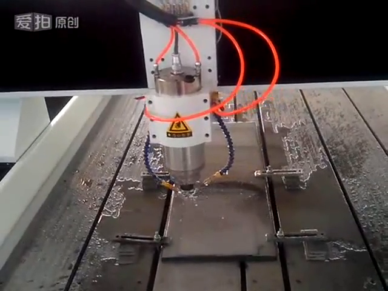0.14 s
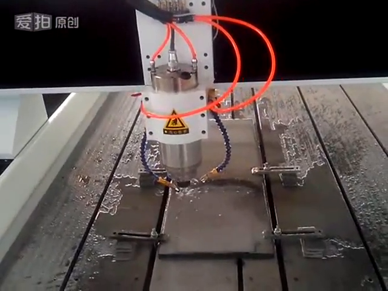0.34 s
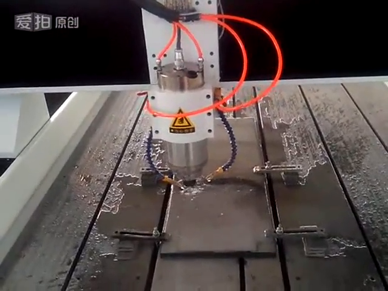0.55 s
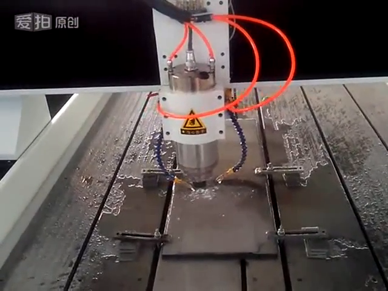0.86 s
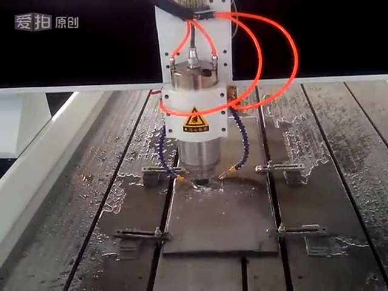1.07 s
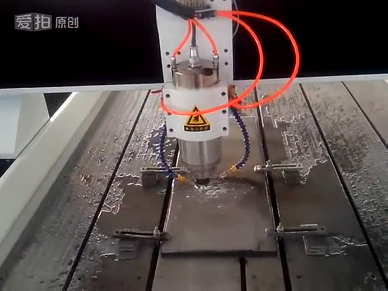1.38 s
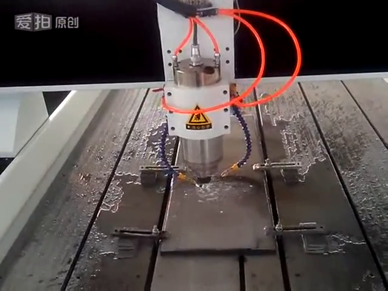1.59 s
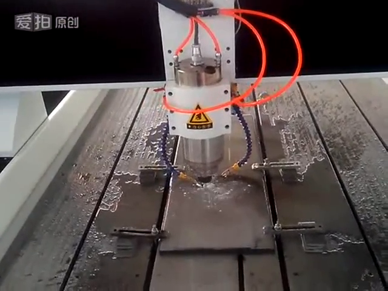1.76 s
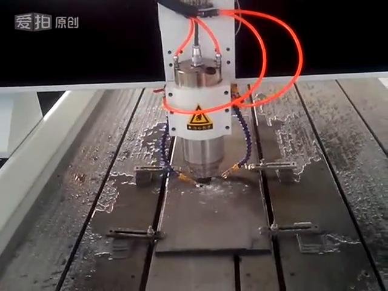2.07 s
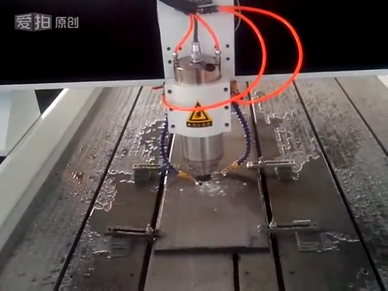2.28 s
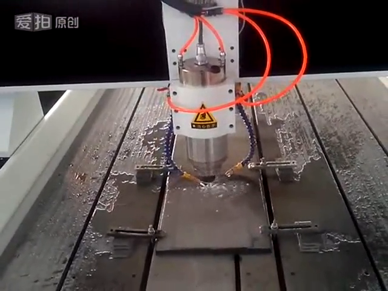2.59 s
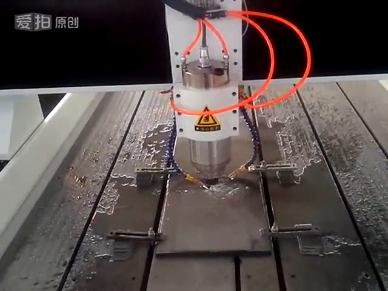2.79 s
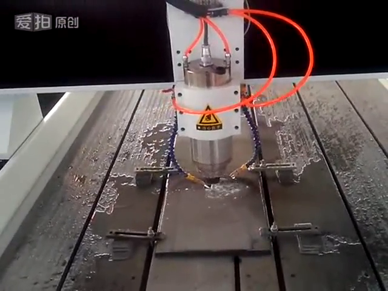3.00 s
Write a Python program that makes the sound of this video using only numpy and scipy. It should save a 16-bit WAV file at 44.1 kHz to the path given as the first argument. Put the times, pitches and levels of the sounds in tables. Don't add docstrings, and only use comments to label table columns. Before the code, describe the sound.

Steady buzzing whine of a stone-cutting router, with gritty rasping, brief squeals and hissing water.

```python
import sys
import numpy as np
from scipy import signal
from scipy.fft import rfft, irfft, next_fast_len
from scipy.io import wavfile
from scipy.ndimage import uniform_filter1d, map_coordinates

SR = 44100
rng = np.random.default_rng(int(sys.argv[2]) if len(sys.argv) > 2 else 0)


def log_audio(samples):
    frames = np.atleast_2d(samples).T
    limited = np.clip(frames, -1, 1)
    pcm = np.round(limited * 32767).astype(np.int16)
    wavfile.write(sys.argv[1], SR, pcm)


def elevation(decibels):
    levels = np.asarray(decibels, float)
    return 10 ** (levels / 20)


N = 138474
T_S = np.arange(N) / SR
SIDE = np.array([[.5], [-.5]])
SHAFT_HZ = 299.85
TURN_GATE = 0.15

# level/dB, left-right/dB
SHAFT_ORDERS = [(-29, -3.5), (-42, -4), (-33, -12.5), (-39, -6), (-46.5, 16), (-31.5, -6.5), (-37.5, 6.5),
                (-51, -2), (-52, -12.5), (-51.5, -18.5), (-46.5, 2.5), (-49, -12.5), (-54.5, -25),
                (-46.5, -11.5), (-47.5, -6), (-47, -3.5), (-50, -13), (-49, 7.5), (-53, -20), (-47.5, -9.5),
                (-47.5, -14.5), (-43.5, -9), (-50.5, -4.5), (-43, -4.5)]
ORDER_PART = (0, 1, 2, 3, 4, 6, 5, 5)
# f/Hz, lead/rad
PORT_LEAD = [(0, 6.5), (1810, -2.5), (2410, -0.5), (3620, -5.5), (4570, -5.5), (7150, -13), (9560, -17)]


def unit(x):
    return x / np.sqrt(np.mean(np.abs(x) ** 2) + 1e-20)


def along(points, hz):
    f, v = np.transpose(points)
    return np.interp(np.log(hz + 1), np.log(f + 1), v)


def curves(rows):
    s, *cols = np.transpose(rows)
    return [np.interp(T_S, s, c) for c in cols]


def wobble(rate_hz):
    return map_coordinates(rng.standard_normal(1000), [np.arange(N) * min(rate_hz, 300) / SR])


def filtered(x, response):
    m = next_fast_len(N + 8192)
    return irfft(rfft(x, m) * response(np.fft.rfftfreq(m, 1 / SR)), m)[..., :N]


def ports(hz):
    # f/Hz, left-right/dB
    port_pan = [(60, -3.5), (160, -3), (450, -2.5), (1240, 5), (3410, -8.5), (9350, -5.5)]
    return elevation(SIDE * along(port_pan, hz)) * np.exp(1j * SIDE * along(PORT_LEAD, hz))


def rush(spectrum, patchy_db, gate=0.):
    # f/Hz, correlation
    port_alike = [(60, .95), (300, .8), (1500, .3), (8000, .4)]
    z = signal.stft(rng.standard_normal((2, N)), nperseg=512)[2]
    field = uniform_filter1d(rng.standard_normal(z.shape[1:]), size=5, axis=0)
    field = uniform_filter1d(field, size=8, axis=1)
    pair = signal.istft(z * elevation(patchy_db * unit(field)), nperseg=512)[1][:, :N]
    pair = pair * (1 + gate * np.cos(2 * np.pi * SHAFT_HZ * T_S))

    def mid_side(hz):
        angle = np.arccos(np.clip(along(port_alike, hz), -1, 1)) / 2
        return [np.cos(angle), np.sin(angle)]

    mid, side = filtered(pair, mid_side)
    pair = np.array([mid + side, mid - side])
    return unit(filtered(pair, lambda hz: elevation(along(spectrum, hz)) * ports(hz)))


def order(k, pan_db, wander):
    wander_db, wander_hz, twist_rad = 1.75, 14, 0.18
    skirt_db, skirt_grow_db, skirt_hz = -19, 1.5, 70
    resonant_orders, resonant_db = (6, 14, 17), 4.5
    grow = np.sqrt(k)

    def pair(rate_hz):
        return np.array([wobble(rate_hz), wobble(rate_hz)])

    drift = 0.57 * wobble(wander_hz) + 0.94 * pair(wander_hz / 2)
    line = elevation(wander * wander_db * np.log(k + .2) * drift)
    twist = twist_rad * grow * wobble(wander_hz) + 0.079 * wander * grow * pair(6.13)
    rate_hz = skirt_hz * grow / 2
    skirt = wobble(rate_hz) + 1j * wobble(rate_hz)
    skirt = skirt + 0.16 * grow * (pair(3 * rate_hz) + 1j * pair(3 * rate_hz))
    level_db = min(skirt_db + skirt_grow_db * k, -2) + resonant_db * (k in resonant_orders)
    mix = unit(line) + elevation(level_db) * unit(skirt)
    phase = 2 * np.pi * (k * SHAFT_HZ * T_S + rng.random())
    phase = phase + SIDE * along(PORT_LEAD, k * SHAFT_HZ) + twist
    return unit(np.real(mix * np.exp(1j * phase))) * elevation(SIDE * pan_db)


def spindle():
    # t/s, level/dB
    frame_ring = [(0.0, -26), (0.86, -29), (1.0, -26), (1.41, -28), (1.68, -44.5), (1.79, -30), (2.03, -35),
                  (2.52, -26), (2.72, -41.5), (2.86, -26.5), (2.94, -23.5), (3.03, -40.5), (3.14, -26)]
    # t/s, level/dB
    bed_ring = [(0.0, -56), (0.26, -40), (0.41, -43.5), (0.52, -63.5), (0.9, -38.5), (1.12, -35),
                (1.5, -57.5), (1.69, -43.5), (1.76, -60.5), (2.13, -42), (3.12, -51), (3.14, -46.5)]
    # t/s, level/dB
    slab_ring = [(0.0, -29), (0.05, -33), (1.26, -31), (1.66, -42), (1.76, -28), (1.86, -41), (1.95, -32.5),
                 (2.34, -33.5), (2.37, -41.5), (2.7, -48), (2.78, -35.5), (2.93, -51), (3.14, -42)]
    # t/s, nut level/dB, shank level/dB
    tool_ring = [(0.0, -44.5, -54), (0.45, -38.5, -47), (0.7, -53.5, -53), (1.09, -43, -39.5),
                 (1.21, -53, -44), (1.31, -41.5, -44), (1.69, -56.5, -54), (1.74, -42.5, -54.5),
                 (2.33, -46.5, -54), (2.48, -41, -36), (2.58, -36, -54), (2.76, -46, -53),
                 (3.14, -42, -47.5)]
    # t/s, level/dB
    collet_ring = [(0.0, -53), (0.28, -33.5), (0.75, -41), (0.78, -50), (1.22, -39), (1.84, -51),
                   (1.88, -46.5), (2.58, -44.5), (2.64, -58.5), (2.77, -35), (2.83, -54), (2.91, -41.5),
                   (3.14, -48.5)]
    # t/s, level/dB
    holder_ring = [(0.0, -38), (0.12, -50), (0.16, -38.5), (0.66, -38.5), (0.68, -48.5), (0.92, -32.5),
                   (1.14, -40.5), (1.44, -36.5), (1.52, -46.5), (1.67, -40.5), (2.3, -42.5), (2.33, -35.5),
                   (3.14, -40.5)]
    # t/s, change/dB
    holder_swells = [
        (.635, 4.5),
        (1.655, 5),
        (1.77, 7.5),
        (2.355, 5),
        (2.58, 3.5),
        (2.79, 4.5),
    ]
    # f/Hz, density/dB
    groan_spectrum = [(350, -19.5), (500, -14), (900, 3), (1650, -5.5), (2000, 1.5), (2250, -14),
                      (2700, -21.5), (3500, -23.5)]
    bed_dip, slab_dip, brief_s = (2.4, -15.5), (2.39, -9), 0.025
    groan_db, groan_follow = -40.5, 0.42

    def brief(s, db):
        return db * np.exp(-((T_S - s) / brief_s) ** 4)

    (frame,), (bed,), (slab,) = curves(frame_ring), curves(bed_ring), curves(slab_ring)
    nut, shank = curves(tool_ring)
    (collet,), (holder,) = curves(collet_ring), curves(holder_ring)
    bed = bed + brief(*bed_dip)
    slab = slab + brief(*slab_dip)
    holder = holder + sum(brief(*row) for row in holder_swells)
    swing = [unit(elevation(part_db)) for part_db in (frame, bed, slab, nut, shank, collet, holder)]

    out = np.zeros((2, N))
    for k, ((db, pan_db), part) in enumerate(zip(SHAFT_ORDERS, ORDER_PART), 1):
        out = out + elevation(db) * swing[part] * order(k, pan_db, wander=0.49)
    groan = rush(groan_spectrum, patchy_db=2.0, gate=TURN_GATE)
    return out + elevation(groan_db) * unit(elevation(groan_follow * frame)) * groan


def chatter(x, centre_hz):
    peak_db, width_log = 10, 0.14
    hz, t, z = signal.stft(x, SR, nperseg=512)
    at_hz = np.interp(t, T_S, centre_hz)
    bump = np.exp(-.5 * (np.log((hz[:, None] + 1) / at_hz) / width_log) ** 2)
    return unit(signal.istft(z * elevation(peak_db * bump), SR, nperseg=512)[1][:, :N])


def cutter():
    # t/s, level/dB, chatter centre f/Hz
    stone_bite = [(0.0, -43, 4450), (0.2, -38, 4380), (0.3, -34, 4260), (0.57, -36, 4440),
                  (0.64, -38.5, 4470), (0.86, -43.5, 4470), (0.9, -35, 4370), (1.45, -37.5, 4290),
                  (1.5, -41.5, 4440), (2.07, -40.5, 4260), (2.27, -39, 4870), (2.31, -31, 5180),
                  (2.39, -30, 4890), (2.43, -29, 5040), (2.55, -33.5, 5030), (2.58, -46.5, 4580),
                  (2.7, -37, 4350), (3.14, -39, 4430)]
    # f/Hz, density/dB
    grit_spectrum = [(2400, -41), (3200, 2.5), (4200, 0), (5200, 2.5), (6500, -5.5), (7600, -5.5)]
    # t/s, level/dB, half length/s, order
    order_squeals = [(0.755, -40, 0.012, 17), (0.678, -37.5, 0.019, 14), (0.705, -36, 0.017, 15),
                     (0.735, -35, .019, 16), (0.744, -29.5, 0.015, 23), (0.756, -37, 0.039, 22),
                     (0.936, -36.5, 0.09, 15), (1.18, -45, 0.29, 12), (1.25, -38.5, 0.17, 15),
                     (2.37, -35, .025, 15), (2.34, -35, .02, 16), (3.03, -40.5, 0.028, 14),
                     (3.025, -29, 0.015, 23), (2.6, -39.5, 0.022, 22), (.35, -46.5, 0.086, 16),
                     (0.826, -37.5, 0.039, 14), (1.393, -40.5, 0.052, 14), (1.675, -38, 0.034, 14),
                     (1.986, -43, 0.1, 14), (2.33, -38.5, 0.018, 14), (2.525, -35, 0.018, 17),
                     (2.46, -35.5, 0.012, 22), (1.3, -43, 0.17, 24), (2.68, -38.5, 0.078, 14),
                     (2.376, -41, 0.075, 17), (2.697, -34, 0.013, 14)]
    # t/s, level/dB, length/s, centre f/Hz, left-right/dB
    grit_spits = [(.285, -32, .013, 3970, -3), (0.311, -33, 0.015, 4550, -13), (0.39, -33, 0.017, 4000, -7),
                  (0.485, -32, 0.02, 4260, -4), (0.533, -33, 0.012, 4720, -8.5),
                  (0.91, -31, 0.013, 4380, -12), (0.972, -27.5, .008, 4480, -13),
                  (1.02, -36, .011, 4280, -5), (1.226, -32, 0.0097, 4350, -5),
                  (1.337, -33, 0.0106, 4340, -5), (2.382, -26.5, .014, 4330, -5),
                  (2.61, -37, .012, 4450, -4), (1.183, -38, 0.052, 6920, 5.5),
                  (1.344, -31.5, 0.027, 7000, -1), (1.427, -35.5, 0.011, 6950, -7),
                  (2.332, -33.5, 0.035, 5470, 10), (2.464, -32, 0.038, 6760, -2),
                  (2.614, -32, 0.022, 6600, 1), (.575, -39, 0.015, 4330, -7)]
    rasp_db, spit_hiss_db, spit_width_log = -1.5, 10.5, 0.058

    bite_db, centre_hz = curves(stone_bite)
    first = len(ORDER_PART)
    high_orders = SHAFT_ORDERS[first:]
    lines = [order(k, pan_db, wander=0.45) for k, (_, pan_db) in enumerate(high_orders, first + 1)]
    whine = sum(elevation(db) * x for (db, _), x in zip(high_orders, lines))
    rasp = elevation(rasp_db) * rush(grit_spectrum, patchy_db=3.5, gate=TURN_GATE)
    out = elevation(bite_db + 2.5 + 1.74 * wobble(29.63)) * chatter(unit(whine) + rasp, centre_hz)

    for s, db, half_s, k in order_squeals:
        out = out + elevation(db) * np.exp(-((T_S - s) / half_s) ** 4) * lines[round(k) - first - 1]

    hiss = rush([(2000, -8.5), (7000, -11.5)], patchy_db=6.0, gate=TURN_GATE)
    comb = unit(sum(lines)) + elevation(spit_hiss_db) * hiss
    for s, db, length_s, hz, pan_db in grit_spits:
        band = filtered(comb, lambda f: np.exp(-.5 * (np.log((f + 1) / hz) / spit_width_log) ** 2))
        band = band / np.sqrt(np.mean(band ** 2, axis=1, keepdims=True))
        out = out + elevation(db + pan_db * SIDE) * np.exp(-.5 * ((T_S - s) / length_s) ** 2) * band
    return out


def coolant():
    # f/Hz, density/dB
    spray_spectrum = [(300, -20), (700, -17.5), (1500, -3.5), (2700, -9), (4500, -12), (6800, 1),
                      (7600, -10.5)]
    return elevation(-34 + 0.69 * wobble(5.9)) * rush(spray_spectrum, patchy_db=3.0, gate=TURN_GATE)


def pump():
    # f/Hz, density/dB
    pump_spectrum = [(25, -33), (60, -40.5), (100, 0.5), (150, -2), (230, 2.5), (400, -1.5), (900, -22.5)]
    level_db = -43 + 2.2 * np.tanh(5 * (T_S - 1.5)) + 1.1 * wobble(12)
    return elevation(level_db) * rush(pump_spectrum, patchy_db=3.0)


def carriage():
    # t/s, level/dB
    carriage_jolts = [
        (.03, -42),
        (1.34, -53),
        (2.4, -42),
    ]
    jolt_hz, jolt_s = 117, 0.031
    swell = sum(elevation(db) * np.exp(-.5 * ((T_S - s) / jolt_s) ** 2) for s, db in carriage_jolts)
    return swell * rush([(20, -20), (jolt_hz, 0), (400, -14), (1500, -40)], patchy_db=-2.5)


def feed():
    # f/Hz, level/dB
    feed_tones = [(398.4, -55), (495.3, -56)]
    centre_s, half_s = 0.71, 0.58
    hum = np.zeros(N)
    for hz, db in feed_tones:
        level = elevation(db + 1.5 + 4.0 * wobble(9))
        hum = hum + level * np.sin(2 * np.pi * hz * T_S + 0.68 * wobble(8))
    return np.exp(-((T_S - centre_s) / half_s) ** 6) * hum * elevation([[-1.5], [1.5]])


def scene():
    return spindle() + cutter() + coolant() + pump() + carriage() + feed()


def phone_sampling(x):
    # f/Hz, gain/dB
    anti_alias = [(7000, 0), (7300, -1), (7550, -6), (7800, -15), (7980, -28)]
    # f/Hz, gain/dB
    mirror_band = [(8020, -24.5), (8300, -15), (8500, -11.5), (8800, -12.5), (9300, -19), (9700, -27.5),
                   (9900, -48)]
    sample_hz = 16000
    image = 2 * x * np.cos(2 * np.pi * sample_hz * T_S)
    kept = filtered(x, lambda hz: elevation(along(anti_alias, hz)) * (hz < sample_hz / 2))
    mirror = filtered(image, lambda hz: elevation(along(mirror_band, hz)) * (hz > sample_hz / 2))
    return kept + mirror


def dropouts(x):
    band_drop_db, bin_drop_db, drop_from_hz, band_bins = -39.5, -45, 6900, 8
    hz, t, z = signal.stft(x, SR, window="cosine", nperseg=2048)
    hz = hz[:-1]
    power = np.abs(z[:, :-1]) ** 2
    bands = power.reshape(2, -1, band_bins, len(t)).sum(axis=2)
    treble = power[:, hz > 3500].sum(axis=1, keepdims=True)
    treble = treble * elevation(5 * rng.standard_normal((1, 1, len(t))))
    keep = np.repeat(bands > elevation(2 * band_drop_db) * treble, band_bins, axis=1)
    keep = keep & (power > elevation(2 * bin_drop_db) * treble)
    keep = keep | (hz[:, None] < drop_from_hz)
    keep = np.pad(keep, ((0, 0), (0, 1), (0, 0)))
    return signal.istft(z * keep, SR, window="cosine", nperseg=2048)[1][:, :N]


def roll_off(x):
    return signal.sosfilt(signal.butter(12, 9950, fs=SR, output="sos"), x)


def record(dry):
    mix = dropouts(phone_sampling(dry))
    return roll_off(mix)


dry = scene()
out = record(dry)
log_audio(out)
```